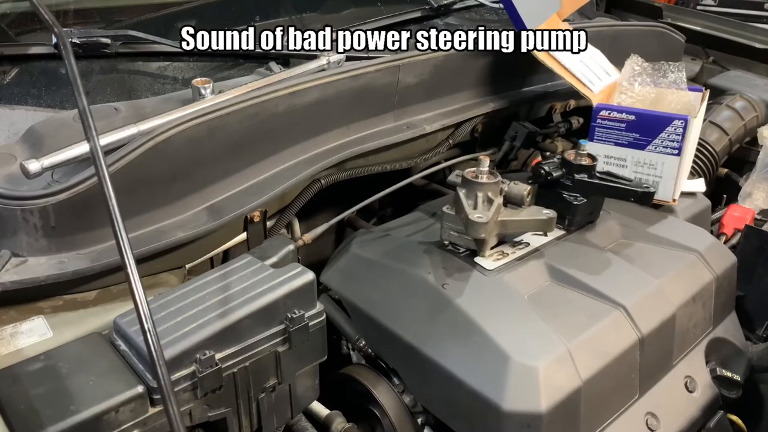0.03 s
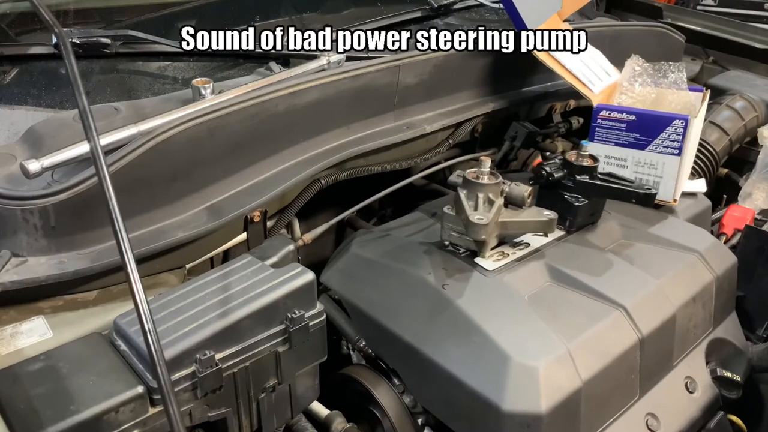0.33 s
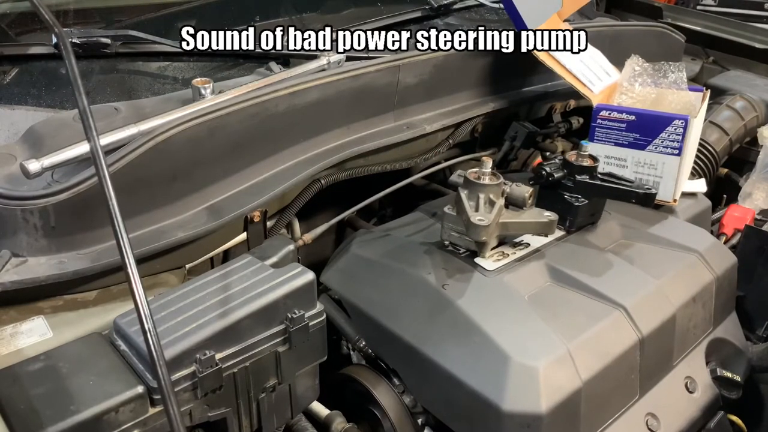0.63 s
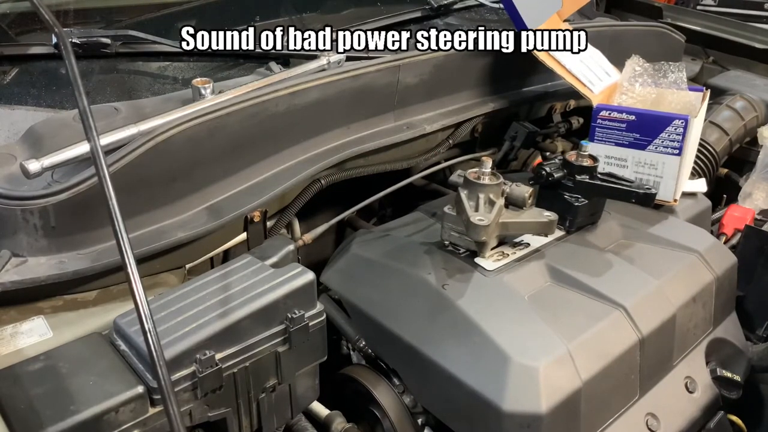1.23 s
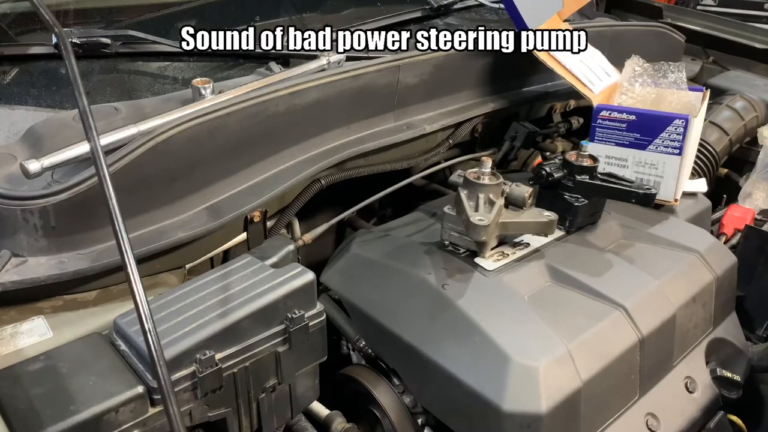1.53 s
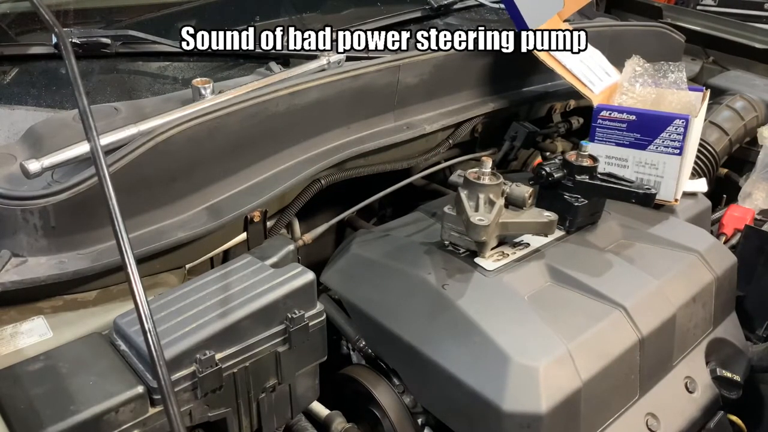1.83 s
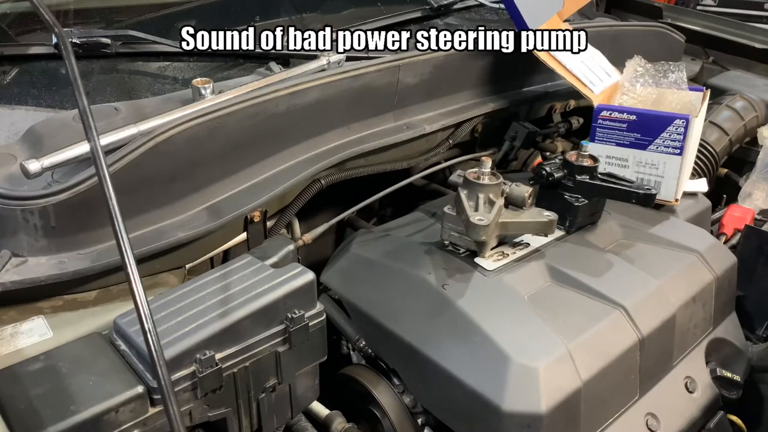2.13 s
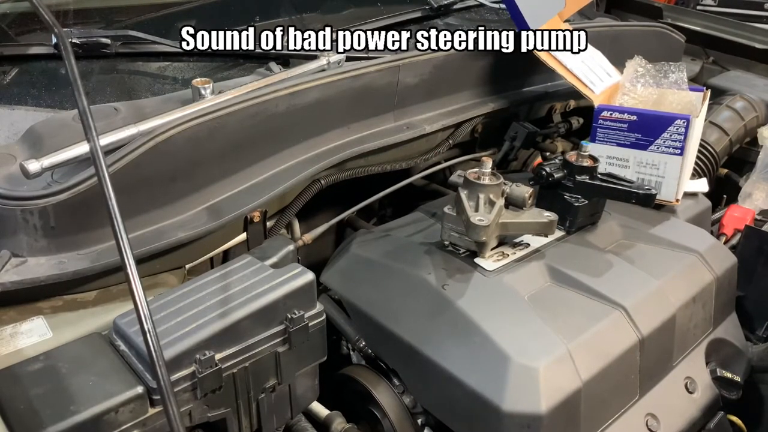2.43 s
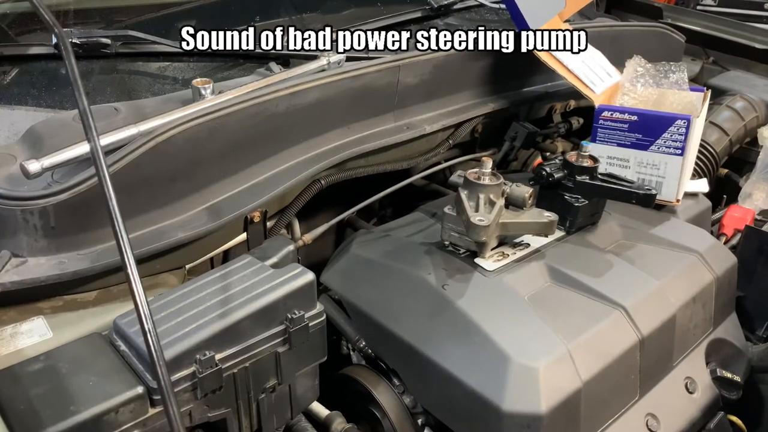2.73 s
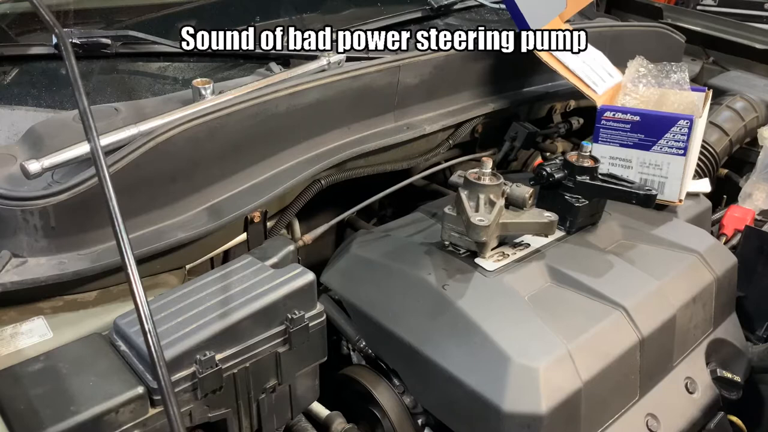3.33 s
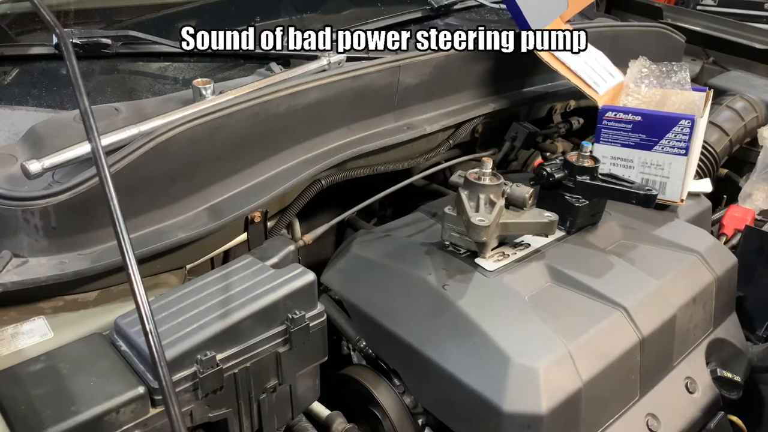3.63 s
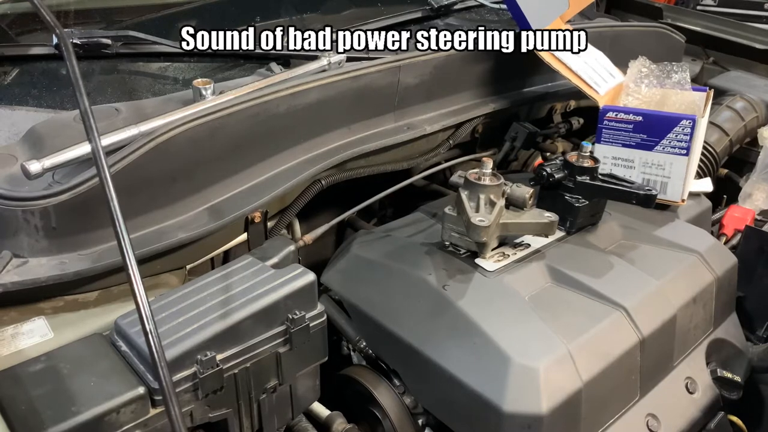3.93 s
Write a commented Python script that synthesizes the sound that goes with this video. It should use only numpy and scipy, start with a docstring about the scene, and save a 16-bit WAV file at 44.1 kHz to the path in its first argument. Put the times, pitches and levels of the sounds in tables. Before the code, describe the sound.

A worn power steering pump rasps and grinds in bursts over an idling car engine.

```python
"""A worn power steering pump rasps in bursts that come longer and closer together, in an open engine bay. Its
vanes whine and slap amid grit; parts inside it stick and slip, making its metal ring in brief squeaks, and
rubbing keeps two modes singing faintly. Behind it the car engine settles from a short rev to idle, with the hum
of the firing, the rumble of the block and the hiss of the belt drive."""
import sys
import numpy as np
from scipy import signal
from scipy.fft import rfft, irfft
from scipy.io import wavfile
from scipy.ndimage import uniform_filter1d

SR = 44100
rng = np.random.default_rng(int(sys.argv[2]) if len(sys.argv) > 2 else 0)


def generate_wav(sig):
    """Save sig (samples, or channels by samples) to the path in sys.argv[1] as 16-bit PCM at SR."""
    pcm = np.round(np.clip(np.atleast_2d(sig).T, -1, 1) * 32767).astype(np.int16)
    wavfile.write(sys.argv[1], SR, pcm)


N = 176400
T, HZ = np.arange(N) / SR, np.fft.rfftfreq(N, 1 / SR)
VANES_PER_FIRING = 4

# Engine speed. Each row: time in seconds, firing rate in Hz.
FIRING_HZ = [(0, 53.57), (.06, 60.1), (.15, 63.3), (.36, 62.4), (.52, 60.25), (.73, 53.72), (.88, 49.83),
             (1.1, 51.05), (1.45, 52.66), (1.7, 51.1), (2, 51.16), (2.35, 49.48), (2.58, 50.57),
             (2.8, 50.15), (3.05, 51.8), (3.3, 52.76), (3.7, 53.54), (4, 53.14)]
# Running noise. Each row: time in seconds, then levels in dB of belt hiss, pump grinding, block rumble.
NOISE_DB = [(0, -28.5, -40, -31), (.22, -38, -35, -31.5), (.3, -34, -30.5, -34), (.38, -31, -29.5, -35.5),
            (.5, -33, -31.5, -35), (.7, -33, -35.5, -38), (1, -38.5, -37.5, -35), (1.5, -37.5, -44, -34.5),
            (2, -39, -43, -36.5), (2.35, -39.5, -35.5, -35), (2.7, -45.5, -35, -38), (3.15, -40, -36, -39),
            (3.57, -43.5, -45.5, -39), (4, -45.5, -47.5, -41)]


def amp(db):
    """Decibels to gain."""
    return 10 ** (np.asarray(db) / 20)


def unit(x):
    """Scale to rms 1."""
    return x / np.sqrt(np.mean(x ** 2) + 1e-20)


def curve(table, column=1):
    """One column of a time table, per sample."""
    rows = np.array(table)
    return np.interp(T, rows[:, 0], rows[:, column])


def spectrum(table):
    """A frequency table, per bin."""
    hz, value = np.transpose(table)
    return np.interp(np.log(HZ + 1), np.log(hz), value)


def wander(hz):
    """Random drift of rms 1, rolled off above hz."""
    return unit(irfft(rfft(rng.standard_normal(N)) * np.exp(-(HZ / hz) ** 2), N))


def firings():
    """Firings counted since the start."""
    return np.cumsum(curve(FIRING_HZ)) / SR


def tone(order, db, flutter, jitter_rad):
    """A multiple of the firing rate, wavering in level and phase."""
    phase = 2 * np.pi * (order * firings() + rng.random()) + jitter_rad * wander(15)
    return np.sqrt(2) * amp(db) * (1 + flutter * wander(13)) * np.sin(phase)


def microphones(direct, diffuse, colour=1):
    """A coloured sound reaches two microphones, partly alike and partly scattered."""
    # Each row: frequency in Hz, left-right coherence from 0 to 1.
    coherence = [(50, .99), (200, .97), (350, .7), (900, .55), (1550, .75), (2100, .5), (4500, .55),
                 (5800, .45), (7000, .9), (9800, .85), (11500, .92), (15000, .8)]
    # Each row: frequency in Hz, phase lead of the left in radians.
    lead_rad = [(100, -.1), (600, .6), (1200, .2), (1550, 1.5), (1900, -.2), (2800, 2), (4500, 1.2),
                (5700, 1.25), (6500, 2.9), (7000, 3.14), (9200, 0), (10000, -.8), (11500, -3.14),
                (13800, -6.28), (16000, -9)]
    # Each row: frequency in Hz, left minus right in dB.
    balance_db = [(50, -1.5), (250, -4), (550, -3), (1000, 0), (2500, 0.5), (4800, -1.5), (8000, 0)]
    alike, tilt = spectrum(coherence), amp(spectrum(balance_db) / 2)
    mid = rfft(direct) * np.sqrt((1 + alike) / 2)
    side = rfft(diffuse) * np.sqrt((1 - alike) / 2)
    left = (mid + side) * tilt
    right = (mid - side) / tilt * np.exp(-1j * spectrum(lead_rad))
    return irfft(np.array([left, right]) * colour, N)


def bay_reflections(x, t60_s=0.035):
    """Short dense reflections between the parts of the engine bay."""
    t = T[:SR // 10]
    tail = rng.standard_normal(len(t)) * np.exp(-np.log(1000) * t / t60_s)
    return signal.fftconvolve(x, tail / np.linalg.norm(tail))[:N]


def throbbing_noise(colour_db, depth):
    """Stereo noise of rms 1, pulsing at the firing rate."""
    noise = rng.standard_normal((2, N)) * (1 + depth * np.cos(2 * np.pi * firings()))
    return unit(microphones(*noise, amp(spectrum(colour_db))))


def block_rumble(sway_db=0.5):
    """The block rumbles, throbbing with the firing."""
    # Each row: frequency in Hz, relative level in dB.
    colour_db = [(15, -22), (35, -27), (50, -19), (80, -3), (130, -7), (210, 0), (300, -13), (400, 0),
                 (560, -1), (800, -7), (1250, -4), (2000, -13.5), (4000, -16), (16000, -29)]
    return throbbing_noise(colour_db, depth=0.16) * amp(curve(NOISE_DB, 3) + sway_db * wander(21))


def belt_hiss(sway_db=0.8):
    """The belt drive hisses, throbbing slightly with the firing."""
    # Each row: frequency in Hz, relative level in dB.
    colour_db = [(200, 3), (600, 1.5), (1100, 3), (1700, 3.5), (2300, -5.5), (3200, 1.5), (3800, 3),
                 (5000, 0.5), (5900, -4.5), (6700, -11), (8100, 5.5), (10000, 3), (12000, -9), (15600, -4)]
    return throbbing_noise(colour_db, depth=0.071) * amp(curve(NOISE_DB, 1) + sway_db * wander(140))


def firing_hum():
    """Harmonics of the firing rate, fuller during the rev."""
    # Boom at order 2. Each row: time in seconds, level in dB.
    boom_db = [(0, -37), (.07, -28), (.15, -33), (.33, -50), (.52, -33.5), (.74, -37), (.88, -53.5),
               (1.4, -44.5), (2.4, -48), (2.7, -52.5), (3.4, -46.5), (3.75, -39.5), (4, -43)]
    # Each row: firing order, base level in dB, gain at peak rev in dB, unsteadiness from 0 to 1.
    orders = [(1, -50, 1.5, .1), (3, -50, 3, .12), (5, -58, -3, .6), (6, -60, 13, .5), (7, -56, 3, .6),
              (11, -55, 0, .8)]
    # Common gain of those orders. Each row: time in seconds, gain in dB.
    gain_db = [(0, 2), (.06, 4.5), (.5, 1), (.8, 2), (1.5, -1), (2.3, 2), (3.1, 0), (3.4, -9), (3.7, -6.5),
               (4, 0)]
    # Drone at order 9, heard during the rev. Each row: time in seconds, level in dB.
    drone_db = [(0, -52), (.22, -52), (.32, -37), (.43, -42), (.53, -36.5), (.62, -50), (.9, -62), (4, -64)]
    rate_hz = curve(FIRING_HZ)
    rev = (rate_hz - rate_hz.min()) / np.ptp(rate_hz)
    hum = tone(2, curve(boom_db), flutter=0.12, jitter_rad=0.056)
    for order, db, rev_db, shake in orders:
        hum += tone(order, db + rev_db * rev + curve(gain_db), flutter=shake, jitter_rad=shake)
    hum += tone(9, curve(drone_db), flutter=0.2, jitter_rad=0.2)
    return microphones(hum, np.zeros(N))


def vane_whine():
    """The pump whines at harmonics of its vane rate."""
    # Each row: time in seconds, then levels in dB of harmonics 1 to 4.
    harmonic_db = [(0, -56, -52, -55, -56), (.14, -50, -52, -43, -62), (.28, -49, -54, -49, -54),
                   (.39, -46, -56, -36.5, -43), (.51, -47, -54, -41, -52), (.7, -56, -56, -62, -60),
                   (.93, -45, -52, -62, -60), (1.2, -54, -55, -60, -62), (1.5, -50, -42, -58, -62),
                   (1.65, -47, -54, -60, -64), (2, -47, -56, -60, -64), (2.25, -41.5, -52, -58, -51),
                   (2.48, -47, -52, -56, -42), (2.68, -54, -46, -51, -44.5), (2.9, -44, -53, -46, -48),
                   (3.05, -45, -48, -39.5, -56), (3.3, -51, -43.5, -37, -62), (3.47, -46, -45, -42, -62),
                   (3.7, -55, -52, -47, -62), (4, -54, -53, -55, -62)]
    # Each row: harmonic number, level in dB relative to harmonic 3.
    overtones = [(5, -12), (6, -20), (7, -18), (9, -9), (11, -11.5), (14, -10)]
    whine = np.zeros(N)
    for k in range(1, 5):
        whine += tone(k * VANES_PER_FIRING, curve(harmonic_db, k), flutter=0.18, jitter_rad=0.15)
    for k, db in overtones:
        whine += tone(k * VANES_PER_FIRING, db + curve(harmonic_db, 3), flutter=0.4, jitter_rad=0.4)
    return microphones(whine, np.zeros(N))


def pump_singing(chatter_hz=1590, chatter_width_hz=20, whistle_hz=4830, whistle_width_hz=260):
    """Rubbing keeps two modes of the pump sounding faintly: a chatter and a breathy whistle."""
    # Each row: time in seconds, chatter level in dB, whistle level in dB.
    level_db = [(0, -62, -68), (.22, -44, -50), (.32, -41, -35), (.48, -48, -36), (.63, -44, -44),
                (.75, -50, -54), (.87, -37.5, -54), (1.03, -42, -62), (1.25, -54, -62), (2.1, -52, -68),
                (2.42, -33, -52), (2.55, -40, -56), (2.7, -35, -62), (2.78, -43, -62), (2.9, -38, -62),
                (3.1, -38, -58), (3.16, -49, -58), (3.35, -39, -52), (3.57, -52, -62), (4, -64, -68)]
    out = 0
    for column, hz, width_hz in [(1, chatter_hz, chatter_width_hz), (2, whistle_hz, whistle_width_hz)]:
        resonance = 1 / (1 + 2 * ((HZ - hz) / width_hz) ** 2)
        mode = unit(microphones(*rng.standard_normal((2, N)), resonance))
        out = out + mode * amp(curve(level_db, column))
    return out


def metal_ring(at_s, db, modes, push_s=0.014, lead_s=0.007, spread_db=2, detune_hz=10.76, roughness=0.38):
    """A brief rub swells the metal's modes; each then dies away at its own rate."""
    t = T[:SR // 5]
    centre_s = t[len(t) // 4]
    push = np.exp(-((t - centre_s) / push_s) ** 2 / 2)
    ring = 0
    for hz, width_hz, mode_db in modes:
        strength, detune, phase = rng.standard_normal(3)
        swell = signal.lfilter([1], [1, -np.exp(-np.pi * width_hz / SR)], push)
        rough = 1 + roughness * unit(uniform_filter1d(rng.standard_normal(len(t)), size=200))
        carrier = np.sin(2 * np.pi * ((hz + detune_hz * detune) * t + phase))
        ring = ring + amp(mode_db + spread_db * strength) * unit(swell * rough * carrier)
    peak_rms = np.sqrt(uniform_filter1d(ring ** 2, size=600).max())
    start = max(round((at_s - centre_s - lead_s) * SR), 0)
    out = np.zeros(N + len(t))
    out[start:start + len(t)] = amp(db) * ring / peak_rms
    return out[:N]


def pump_squeaks(squeak_gain_db=-1.6, clank_s=1.146, clank_db=-27):
    """Parts inside the pump stick and slip, ringing its metal in brief squeaks; one clank sounds lower."""
    # Each row: time in seconds, level in dB before squeak_gain_db.
    squeaks = [(.109, -23.5), (.191, -23.5), (.272, -24), (.345, -24.5), (.602, -31), (.7, -31),
               (1.119, -26.5), (1.202, -28), (1.335, -23.5), (1.442, -28), (1.584, -30.5), (1.667, -26),
               (1.73, -22), (1.805, -25.5), (2.05, -34), (2.145, -22.5), (2.26, -24.5), (2.348, -20),
               (2.395, -23.5), (2.455, -23), (2.57, -29), (2.615, -26), (2.66, -28.5), (2.838, -24),
               (2.907, -31), (3.025, -28), (3.091, -27.5), (3.212, -26.5), (3.258, -30), (3.32, -29),
               (3.352, -30.5), (3.45, -32), (3.49, -29), (3.665, -29), (3.71, -32), (3.849, -32.5)]
    # Modes of a squeak and of the clank. Each row: frequency in Hz, width in Hz, relative level in dB.
    squeak_modes = [(1127, 45, -13), (1517, 28, -2.5), (1585, 26, 0), (1903, 32, -13), (2186, 35, -16),
                    (2338, 45, -16), (2433, 35, -15), (2613, 40, -15)]
    clank_modes = [(960, 70, -17), (1124, 45, 0), (1290, 150, -15)]
    paths = []  # direct, diffuse
    for _ in range(2):
        rings = sum(metal_ring(at_s, db, squeak_modes) for at_s, db in squeaks)
        paths.append(amp(squeak_gain_db) * rings + metal_ring(clank_s, clank_db, clank_modes))
    return microphones(*paths)


def vane_grinding(slap_s=0.0009, slap_share=0.33, slap_spread_db=2.8, grit_per_s=8000, grit_spread_db=2.5):
    """Each passing vane slaps amid dense grit, coloured by the pump housing; rms 1."""
    # Each row: frequency in Hz, relative level in dB.
    colour_db = [(100, -41), (330, -15), (560, 0), (720, -7.5), (900, -8), (1200, -6.5), (1700, -7.5),
                 (2300, 0), (3100, -1.5), (4100, -2), (4700, 0), (5400, 1), (6200, 0), (6900, -9),
                 (9000, -7.5), (10000, -4), (11500, -17), (14000, -13), (15600, -22)]
    # Housing resonances. Each row: frequency in Hz, width in Hz, lift in dB.
    housing = [(1590, 45, 9), (1903, 45, 9), (1962, 35, 6), (2186, 55, 9), (2325, 70, 7), (2433, 45, 7),
               (2620, 50, 6), (3420, 50, 4), (3630, 40, 5), (4878, 60, 6), (5120, 45, 3), (5370, 90, 2),
               (5730, 45, 3), (5977, 45, 4), (6150, 170, 6), (8100, 450, 4), (9800, 130, 5),
               (10030, 220, 5.5), (12100, 400, 5)]
    vane_count = np.floor(firings() * VANES_PER_FIRING + 0.05 * wander(200))
    passes = np.diff(vane_count, prepend=0) > 0
    hits = passes * amp(slap_spread_db * np.clip(rng.standard_normal(N), -2, 2))
    slap_envelope = signal.lfilter([1], [1, -np.exp(-1 / (slap_s * SR))], hits)
    grit = (rng.random((2, N)) < grit_per_s / SR) * rng.choice([-1, 1], (2, N))
    grit = grit * amp(grit_spread_db * np.minimum(rng.exponential(1, (2, N)), 4))
    slaps = slap_envelope * rng.standard_normal((2, N))
    direct, diffuse = np.sqrt(slap_share) * unit(slaps) + np.sqrt(1 - slap_share) * unit(grit)
    direct = unit(direct + bay_reflections(direct))
    housing_db = sum(db / (1 + (2 * (HZ - hz) / width_hz) ** 2) for hz, width_hz, db in housing)
    return unit(microphones(direct, diffuse, amp(spectrum(colour_db) + housing_db)))


def sizzle(sound, level_db, corner_hz=6930, pivot_db=-26.5, db_per_db=0.69, flicker_db=2.5):
    """Harder rubbing is brighter, and its treble flickers."""
    treble = irfft(rfft(sound) * (1 - np.exp(-(HZ / corner_hz) ** 6)), N)
    lift_db = db_per_db * np.maximum(level_db - pivot_db, -6) + flicker_db * wander(31)
    return sound + treble * (amp(lift_db) - 1)


def pump_rasp(lead_s=0.005, release_s=0.015, hiss_hz=5400, hiss_width_hz=1100, sway_db=0.68):
    """Rasping bursts swell out of the pump's steady grinding, some hissier than others."""
    # Each row: start in seconds, length in seconds, base level in dB, attack in seconds, hiss lift in dB.
    bursts = [(0, .12, -27, 0.033, -2.5), (0.159, 0.027, -23.5, 0.02, -1), (0.243, 0.082, -27, 0.016, 0.5),
              (1.1, 0.036, -28.5, 0.018, -1), (1.172, 0.053, -30, .019, 1.5), (1.31, 0.03, -28, 0.014, 0),
              (1.422, .025, -30, 0.015, -2), (1.57, 0.027, -34.5, 0.013, -6),
              (1.645, 0.035, -30, 0.012, -2.5), (1.7, 0.032, -30, 0.021, 3.5),
              (1.77, 0.032, -27, .022, 2.5), (2.035, 0.032, -31, .019, -12), (2.11, 0.043, -26.5, 0.025, 1),
              (2.219, .037, -25.5, .019, 2), (2.31, 0.15, -25, 0.019, 3), (2.548, 0.049, -23.5, 0.018, 2),
              (2.599, 0.062, -26.5, .019, 3.5), (2.776, 0.067, -24.5, 0.02, 2.5),
              (2.877, 0.034, -31.5, 0.013, -6), (2.974, .06, -24, 0.026, 1.5),
              (3.054, .046, -23.5, 0.015, 1.5), (3.205, 0.081, -25, 0.0055, 3),
              (3.283, 0.061, -26, 0.023, 4), (3.348, 0.063, -28.5, 0.012, 2),
              (3.424, 0.081, -27.5, 0.031, 1.5), (3.605, .031, -29.5, 0.014, 0.5),
              (3.639, 0.076, -29.5, 0.02, 0), (3.819, 0.034, -29.5, .026, 0.5)]
    grinding = vane_grinding()
    power = hiss_power = amp(curve(NOISE_DB, 2)) ** 2
    for start_s, length_s, db, attack_s, hiss_db in bursts:
        rise = np.clip((T - start_s + lead_s) / attack_s, 0, 1)
        gate = rise * np.exp(-np.maximum(T - start_s - length_s, 0) / release_s)
        power = power + (amp(db) * gate) ** 2
        hiss_power = hiss_power + (amp(db + hiss_db) * gate) ** 2
    hiss = irfft(rfft(grinding) * np.exp(-((HZ - hiss_hz) / hiss_width_hz) ** 2), N)
    rasp = grinding + hiss * (np.sqrt(hiss_power / power) - 1)
    return sizzle(rasp, 10 * np.log10(power)) * np.sqrt(power) * amp(sway_db * wander(70))


def scene():
    """Engine, belt drive and pump, in stereo."""
    background = firing_hum() + vane_whine() + block_rumble() + belt_hiss()
    return background + pump_rasp() + pump_squeaks() + pump_singing()


def record(dry):
    """Steep low-pass at 15850 Hz."""
    lowpass = signal.firwin(511, 15850, window=("kaiser", 9), fs=SR)
    return signal.oaconvolve(dry, lowpass[None], "same")


dry = scene()
out = record(dry)
generate_wav(out)
```